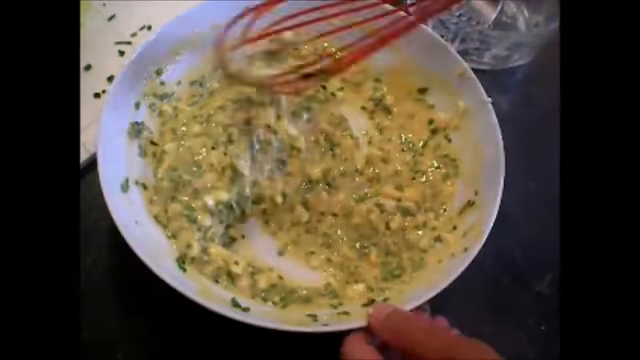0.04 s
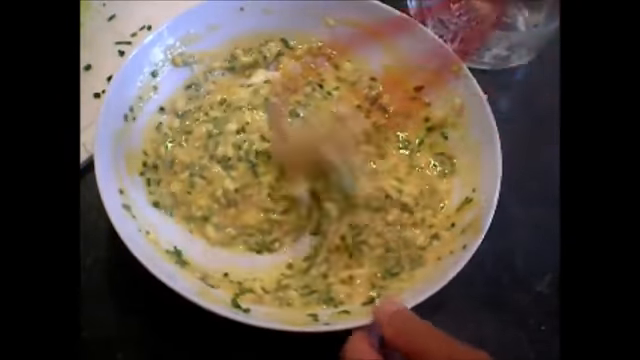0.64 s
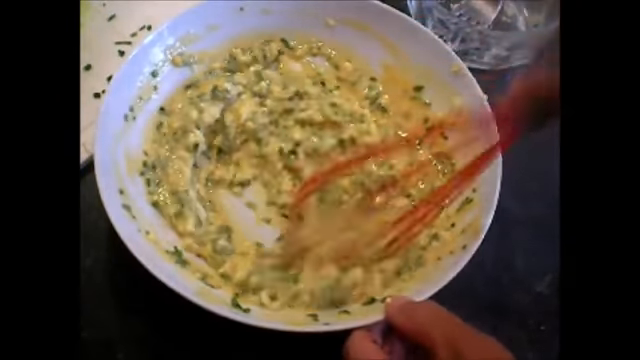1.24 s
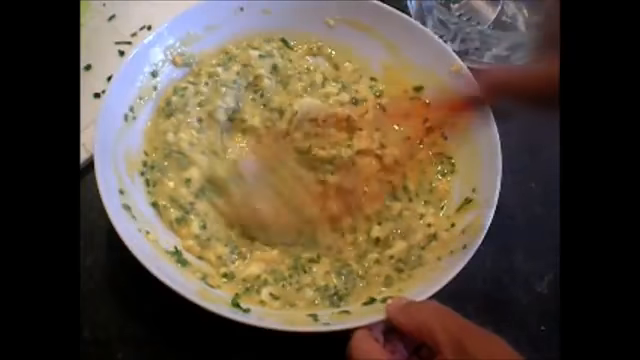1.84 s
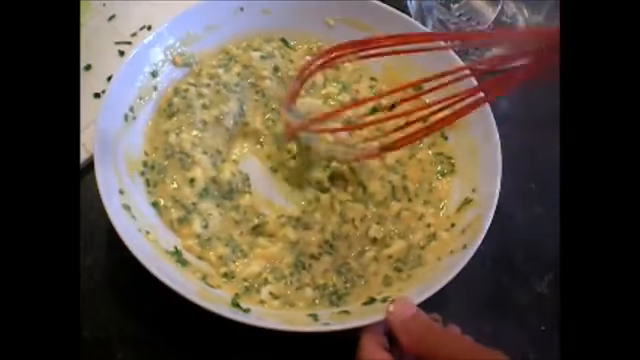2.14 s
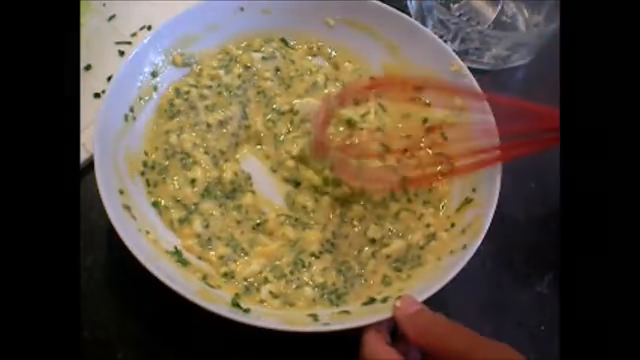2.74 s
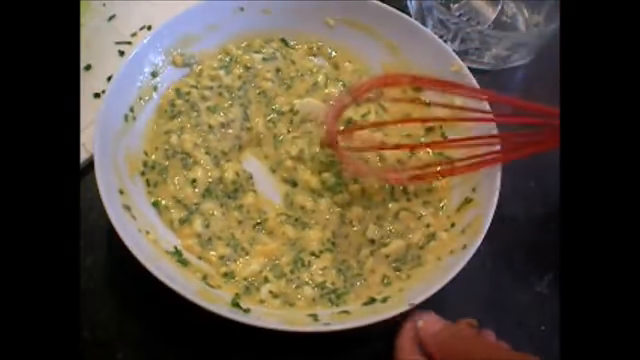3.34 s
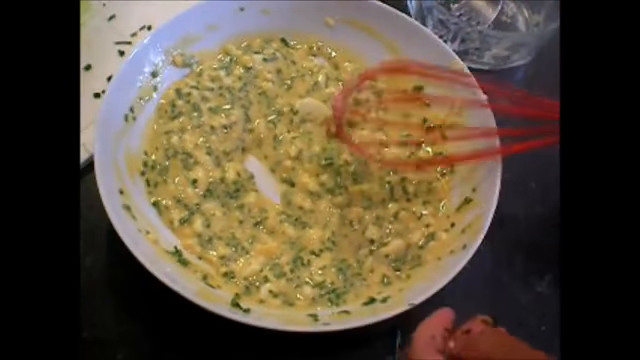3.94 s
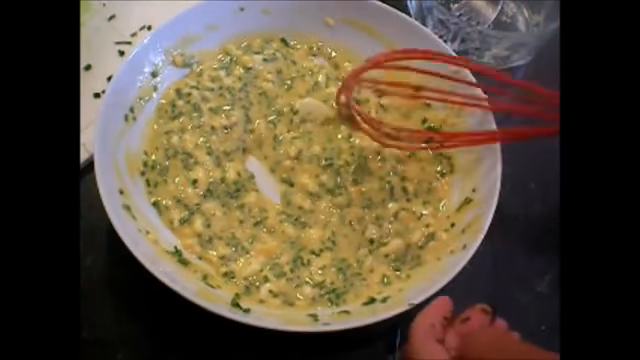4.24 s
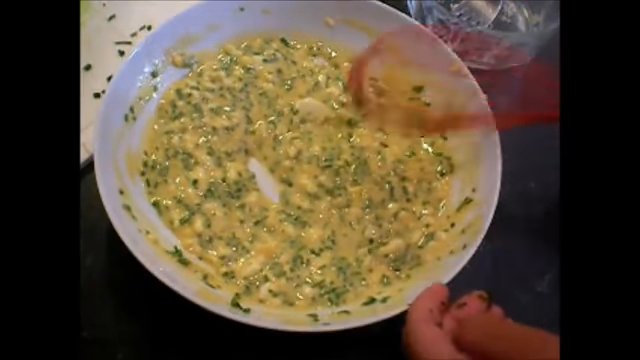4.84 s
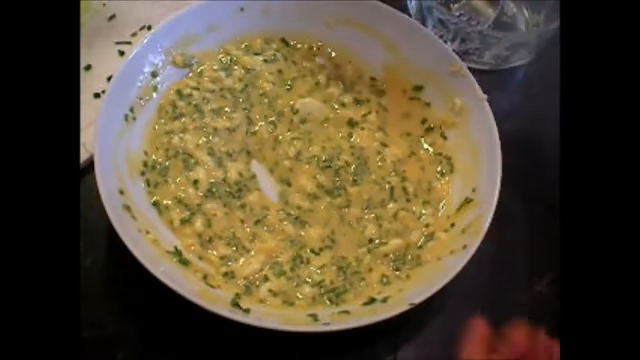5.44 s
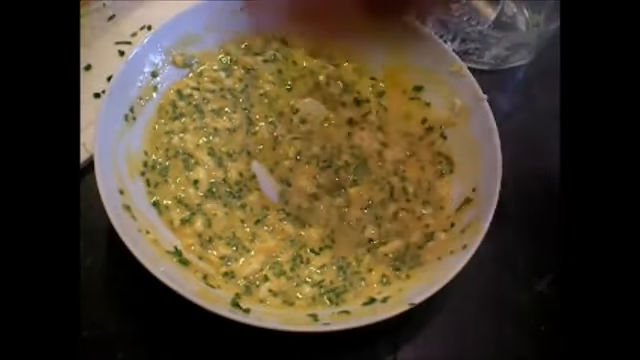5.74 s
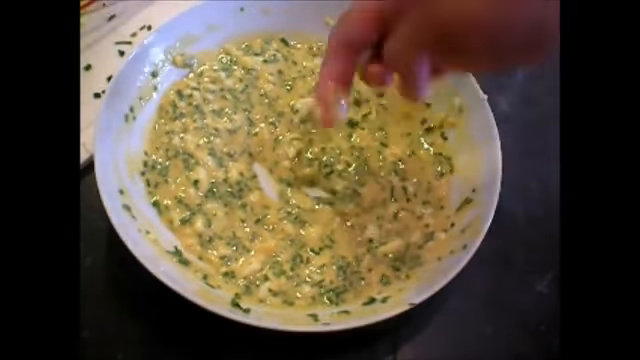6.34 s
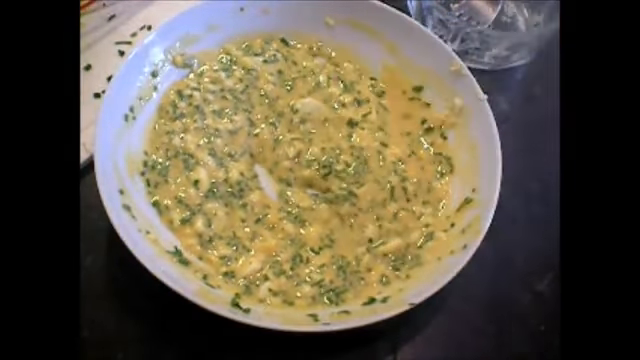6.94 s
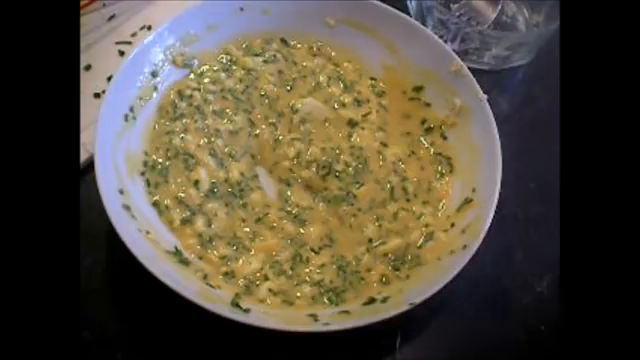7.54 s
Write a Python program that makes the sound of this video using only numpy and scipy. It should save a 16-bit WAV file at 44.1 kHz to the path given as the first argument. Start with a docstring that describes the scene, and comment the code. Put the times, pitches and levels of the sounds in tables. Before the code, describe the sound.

Wet stirring and plops, then about fifteen ringing whisk taps on a bowl, followed by one loud knock and light handling clicks.

```python
"""Wet squishes, plops and smacks: a whisk stirs thick herb sauce in a ceramic bowl, opening air pockets.
Fifteen raps shake the whisk clean, each ringing the bowl while the wires clatter against it.
It is put down with a loud knock and bounces, rattling, against a ringing dish; soft rubs and
light handling clicks surround the knock. A small kitchen adds a short echo, and everything
comes through a hissy, narrow-band microphone that overloads on the knock."""
import sys
import numpy as np
from scipy import signal
from scipy.fft import rfft, irfft, next_fast_len
from scipy.io import wavfile
from scipy.ndimage import uniform_filter1d

SR = 44100
rng = np.random.default_rng(int(sys.argv[2]) if len(sys.argv) > 2 else 0)


def wav_record(signal):
    """Record a signal, one row per channel, as 16-bit PCM in the file named by sys.argv[1]."""
    frames = np.transpose(np.atleast_2d(signal))
    bounded = np.clip(frames, -1, 1)
    # unit amplitude maps onto the largest positive 16-bit level
    quanta = np.round(bounded * 32767).astype(np.int16)
    wavfile.write(sys.argv[1], SR, quanta)


N = 335019
T = np.arange(round(.5 * SR)) / SR  # time axis of one hit
LEAD = 256  # samples of silence ahead of a voiced hit
# low, mid and high band edges of smacks and clicks: f/Hz
SMALL_EDGES_HZ = [250, 800, 2200, 4000]


def amp(db):
    """Decibels to gain."""
    return 10 ** (np.asarray(db) / 20)


def unit_rms(x):
    """Scales to rms 1."""
    return x / np.sqrt(np.mean(x ** 2) + 1e-20)


def curve_at(points, hz):
    """Reads (f/Hz, value) points on a log-frequency axis."""
    f, value = np.transpose(points)
    return np.interp(np.log(hz + 1), np.log(f + 1), value)


def eq(x, spectrum):
    """Filters by a curve of (f/Hz, gain/dB) points."""
    size = next_fast_len(len(x), True)
    gain = amp(curve_at(spectrum, np.fft.rfftfreq(size, 1 / SR)))
    return irfft(rfft(x, size) * gain, size)[:len(x)]


def add(mix, s, sound):
    """Mixes a sound in at s seconds."""
    part = mix[max(round(s * SR), 0):][:len(sound)]
    part += sound[:len(part)]


def ring(modes, spread_db, detune=0):
    """Dying sines; the point of contact favours some modes, and the grip can detune them a little."""
    hz, db, t60 = np.transpose(modes)[:, :, None]
    polarity = (-1) ** np.arange(len(hz))[:, None]
    gain = polarity * amp(db + spread_db * rng.standard_normal(db.shape))
    hz = hz * (1 + detune * rng.standard_normal(hz.shape))
    return (gain * amp(-60 * T / t60) * np.sin(2 * np.pi * hz * T)).sum(0)


def room_tail(spectrum, rise_s):
    """A diffuse wash of noise, each band dying at the kitchen's own speed."""
    # kitchen reverb time: f/Hz, t60/s
    decay = [(100, 0.63), (400, 0.37), (800, 0.39), (1500, 0.34), (3500, 0.34)]
    noise = unit_rms(eq(rng.standard_normal(len(T)), spectrum))
    hz, t, bands = signal.stft(noise, SR, nperseg=512)
    fade = amp(-60 * t / curve_at(decay, hz)[:, None])
    wash = signal.istft(bands * fade, SR, nperseg=512)[1][:len(T)]
    return wash * (1 - np.exp(-T / rise_s))


def in_kitchen(x, wet_db):
    """A sound plus its own echo from the kitchen."""
    echo = room_tail([(100, 0.0084), (4000, 0.0098)], rise_s=0.0023)
    return x + amp(wet_db) * signal.fftconvolve(x, echo / np.linalg.norm(echo))[:len(x)]


def voiced(x, edges_hz, peaks_db, window_s):
    """Gives a hit its weight and colour: a smooth EQ steers each band's peak toward its target."""
    x = np.pad(x, (LEAD, 32768 - LEAD - len(x)))
    spectrum, hz = rfft(x), np.fft.rfftfreq(len(x), 1 / SR)
    colour = []
    for lo, hi, db in zip(edges_hz, edges_hz[1:], peaks_db):
        band = irfft(spectrum * (hz > lo) * (hz < hi))
        peak_power = uniform_filter1d(band ** 2, max(round(window_s * SR), 1)).max()
        colour += [(f, db - 10 * np.log10(peak_power)) for f in np.linspace(lo, hi, 6)[[1, 4]]]
    thin_bass = [(45, colour[0][1] - 20), (130, colour[0][1] - 2)]  # small things radiate little bass
    return eq(x, thin_bass + colour)


def hiss(level_db=-48):
    """Steady noise of the microphone."""
    # noise colour: f/Hz, relative density/dB
    colour = [(15, -30), (25, -16.5), (76, -8), (152, -7), (246, -6), (291, -3.5), (481, -3.5), (864, -4),
              (1110, -5), (1290, -6.5), (1620, -7.5), (3520, -9.5), (4100, -10.5), (5000, -80)]
    return amp(level_db) * unit_rms(eq(rng.standard_normal(N), colour))


def pressure(start, length, attack_s, release_s, sag_db):
    """One stroke presses in, eases as it travels and lifts off."""
    t = np.arange(N) / SR - start
    contact = np.clip(np.minimum(t / attack_s, (length - t) / release_s + .5), 0, 1)
    return contact * amp(sag_db * np.clip(t / length, 0, 1))


def friction(strokes, pops_per_s, spread_db, low_db, high_db, **envelope):
    """Crowds of tiny pops under each stroke: a dull squish and a finer crackle."""
    # colours of the two layers: f/Hz, gain/dB
    squish = [(50, -42.5), (170, -17), (340, -2), (520, -0.5), (1200, -6), (2000, -25), (5000, -53.5)]
    crackle = [(100, -56), (500, -4.5), (1500, 0), (3700, 5.5), (6000, -52)]
    _, _, squish_db, crackle_db = np.transpose(strokes)
    pressed = np.array([pressure(start, length, **envelope) for start, length, *_ in strokes])
    out = np.zeros(N)
    for db, colour in ((squish_db + low_db, squish), (crackle_db + high_db, crackle)):
        sizes = rng.standard_normal(N) * amp(spread_db * np.minimum(rng.exponential(1, N), 4))
        pops = sizes * (rng.random(N) < pops_per_s / SR)
        texture = unit_rms(eq(in_kitchen(pops, wet_db=-5), colour))
        out += texture * (amp(db) @ pressed)
    return out


def stirring():
    """The whisk drags through the sauce in sparse, uneven pops."""
    # whisk strokes: t/s, length/s, relative squish/dB, relative crackle/dB
    strokes = [(.01, 0.18, -49, -58), (.23, 0.068, -71, -47), (.39, 0.14, -67, -50),
               (.62, 0.12, -47.5, -53), (.8, 0.22, -52.5, -63), (1.07, 0.12, -50, -70),
               (1.19, .08, -62, -45), (1.38, 0.077, -51, -44), (1.48, 0.35, -48, -54),
               (1.8, .08, -56, -47.5), (1.96, 0.16, -53, -58)]
    return friction(strokes, pops_per_s=700, spread_db=2, low_db=-0.5, high_db=-4.5,
                    attack_s=0.027, release_s=0.056, sag_db=-6)


def plops(glide=0.52):
    """Each air pocket in the sauce rings like a bubble, rising a little as it opens."""
    # air pockets: t/s, level/dB, starting f/Hz, t60/s
    pockets = [(0.066, -26.5, 500, 0.061), (0.484, -36.5, 453, 0.079), (0.588, -32.5, 310, 0.04),
               (0.645, -43, 762, 0.1), (0.815, -40, 544, 0.11), (0.832, -41, 611, 0.1),
               (1.092, -38, 477, 0.055)]
    out = np.zeros(N)
    for s, db, hz, t60 in pockets:
        tone = np.sin(2 * np.pi * hz * T * (1 + glide * T))
        envelope = amp(db - 60 * T / t60) * (1 - np.exp(-T / 0.0029))
        add(out, s, in_kitchen(tone * envelope, wet_db=-12))
    return out


def small_colour(db, hz, fall_db_per_octave=9):
    """Band peaks of a smack or click: strongest around hz, weaker to either side."""
    edges = np.log2(SMALL_EDGES_HZ)
    centres = (edges[1:] + edges[:-1]) / 2
    return db - fall_db_per_octave * abs(centres - np.log2(hz))


def smacks():
    """A film of sauce snaps off a wire: a tick and a short fizz."""
    # snapping films: t/s, level/dB, strongest f/Hz
    films = [(.45, -39.5, 3800), (.482, -34.5, 3800), (.881, -35, 3100), (.985, -43, 1450),
             (1.144, -39.5, 1000), (1.323, -40, 3800), (1.5, -38, 1450), (1.595, -39.5, 1400),
             (1.608, -41.5, 2800), (1.644, -40, 3800), (1.865, -28, 1620), (1.877, -30, 1410),
             (1.973, -36, 1850), (2.001, -39, 1200), (2.212, -38, 3500), (2.223, -38, 1860),
             (2.352, -32.5, 3760)]
    out = np.zeros(N)
    for s, db, hz in films:
        snap = 0.14 * rng.standard_normal(len(T)) * np.exp(-T / 0.014)
        snap[0] += 3  # the tick
        snap = signal.lfilter(*signal.butter(2, 350, "high", fs=SR), snap)  # too small to move bass
        snap = in_kitchen(snap, wet_db=-12)
        add(out, s - LEAD / SR, voiced(snap, SMALL_EDGES_HZ, small_colour(db, hz), window_s=0.0049))
    return out


def rap_colour(force, hollow, clean):
    """Band peaks of a rap in dB; the place of contact trades the hollow body against the main ring."""
    low, high = .55 * force, 1.45 * force  # a harder rap is brighter
    thud = -35.5 + low
    body = -27 + low + hollow
    low_ring = -30 + low + hollow
    main_ring = -29.5 + high - .8 * hollow + clean
    clack = -32 + high - .8 * hollow - clean
    top_ring = -31 + high + .7 * hollow
    return [thud, body, low_ring, main_ring, clack, top_ring]


def raps(clatter_db=-9, chatter=0.42, thump_growth=1.9):
    """Each rap rings bowl and kitchen, the wires slap again lightly, and hard raps thump the counter."""
    # whisk on bowl: t/s, force/dB, hollowness/dB, cleanness (ring against wire clack)/dB
    hits = [(2.763, 1, -4, 1.5), (2.905, -1, -2.5, -1), (3.0595, 0.5, -1.5, 4), (3.2152, 5.5, -1, -1),
            (3.3748, 5, -0.5, 1), (3.535, 2.5, -0.5, -0.5), (3.692, 3, 1, -0.5), (3.853, -2, -.5, -.5),
            (4.02, 1.5, .5, -0.5), (4.184, 1, 3, -0.5), (4.35, -4.5, 0.5, -.5), (4.5262, -6.5, 1, 2),
            (4.733, -5, -1.5, 2), (4.891, -3.5, 0, -1), (5.274, 1.5, 3, -2.5)]
    # low resonances of the kitchen, higher modes of the bowl and wires: f/Hz, relative level/dB, t60/s
    resonances = [(145, -22.5, 0.057), (385, -16.5, 0.16), (455.4, -15, 0.26), (598, -15.5, 0.24),
                  (708, -20.5, 0.093), (766, -18, 0.33), (870, -19.5, 0.051), (905.4, -9.5, 0.11),
                  (957, -8.5, 0.042), (1008, -6.5, 0.1), (1076.5, -9, 0.093), (1298, -21, .18),
                  (1367, -12.5, 0.22), (1410, -18, 0.14), (1548, -21, 0.16), (1834, 5.5, 0.034),
                  (2121, -1.5, .24), (2150, 4, .065), (2226, 10.5, 0.039), (2553, 7.5, 0.016),
                  (2713, 6, 0.017), (2943, -2.5, 0.093), (3004, -5, .24), (3033, -3, .08), (3077, 3, 0.02),
                  (3660, -9.5, 0.064), (4005, -6, 0.084)]
    # dull clatter of wires and counter: f/Hz, relative density/dB
    clatter_colour = [(60, -11.5), (140, -7), (220, -14), (380, 5.5), (800, 4), (1100, -1.5), (1550, -1),
                      (1900, -14), (2600, -14.5), (3300, -4.5), (4000, -17.5)]
    # edges of the six bands from thud to top ring: f/Hz
    edges_hz = [150, 650, 1200, 1650, 2230, 2850, 4000]
    # modes of the counter under the bowl: f/Hz, relative level/dB, t60/s
    counter_modes = [(166, -54, 0.098), (215, -52, .06)]
    out = np.zeros(N)
    for s, force, hollow, clean in hits:
        ringing = ring(resonances, spread_db=1.3, detune=.002)
        rap = ringing.copy()
        for delay_s, slap in zip(rng.uniform(0.00041, 0.0093, 3), rng.standard_normal(3) / 2):
            add(rap, delay_s, chatter * slap * ringing)
        rap = in_kitchen(rap, wet_db=-10) + amp(clatter_db) * room_tail(clatter_colour, rise_s=0.0015)
        add(out, s - LEAD / SR, voiced(rap, edges_hz, rap_colour(force, hollow, clean), window_s=0.012))
        add(out, s, amp(thump_growth * force) * ring(counter_modes, spread_db=3, detune=0.066))
    return out


def rubbing():
    """A hand slides over things with a dense, scratchy grain."""
    # hand strokes: t/s, length/s, relative dull layer/dB, relative scratch/dB
    strokes = [(5.4, 0.18, -42, -51), (5.59, .14, -43.5, -55), (5.9, .07, -45, -52),
               (6.22, 0.26, -58.5, -53.5), (6.45, 0.11, -65.5, -52), (6.6, 0.31, -59, -54.5),
               (6.82, 0.32, -67, -52.5), (7.24, 0.17, -52, -49), (7.41, .09, -45.5, -53)]
    return friction(strokes, pops_per_s=2500, spread_db=0, low_db=-2, high_db=7,
                    attack_s=0.023, release_s=.06, sag_db=-6.5)


def clicks():
    """Things moved on the counter knock lightly: a burst of noise and a short ring."""
    # light knocks: t/s, level/dB, strongest f/Hz
    knocks = [(5.425, -36, 706), (5.445, -36, 2100), (5.831, -43, 432), (6.842, -36, 2500),
              (6.92, -32, 1920), (7.03, -32.5, 3700), (7.398, -30, 1150), (7.547, -34, 3800)]
    # utensil modes: f/Hz, relative level/dB, t60/s
    modes = [(387, -6.5, 0.071), (1303, 7.5, 0.045), (1390, -8.5, 0.055), (2600, -9.5, .025),
             (3190, -14.5, 0.028), (3630, -9, 0.068)]
    out = np.zeros(N)
    for s, db, hz in knocks:
        knock = ring(modes, spread_db=2) + 4 * rng.standard_normal(len(T)) * np.exp(-T / .005)
        knock = in_kitchen(knock, wet_db=-6.5)
        add(out, s - LEAD / SR, voiced(knock, SMALL_EDGES_HZ, small_colour(db, hz), window_s=0.0042))
    return out


def landing(ring_db=2, settle_s=6.176, damping_db=-6):
    """The whisk lands hard and bounces, wires rattling; a dish rings, muted as the whisk settles on it."""
    # landing and bounces: t/s, clack gain/dB, wire rattle gain/dB, dish ring gain/dB
    bounces = [(5.961, 3, -15, -35.5), (6.006, -9, -14.5, -39), (6.0118, -11, -24.5, -31),
               (6.0196, -29, -35, -7.5), (6.0533, -37, -24.5, -32.5), (6.0942, -42, -34.5, -22.5),
               (6.158, -47, -38, -29), (6.2, -53.5, -36.5, -55)]
    # modes of the handle on the counter: f/Hz, relative level/dB, t60/s
    handle_modes = [(115.5, -41.5, 0.13), (244, -23.5, 0.02), (336, -31, 0.11), (661, -22, 0.018),
                    (1506, -6.5, 0.012), (1810, 0, 0.0069), (2337, -6, 0.019), (3160, -20, 0.17),
                    (3323, -5.5, 0.014), (3530, 2.5, 0.013)]
    # rattling wires, spread by the kitchen: f/Hz, relative density/dB
    rattle_colour = [(60, -29), (130, -22.5), (300, -10.5), (700, -7.5), (1100, -6), (1500, -2), (2200, -5),
                     (2800, 3), (3300, 5.5), (4000, -7.5)]
    # dish modes, the closest of them beating: f/Hz, relative level/dB, t60/s
    dish_modes = [(2616, 0, .055), (2656, 0, .055), (2636, -11, .42), (2767, -20, .22), (3230, -20.5, .38),
                  (3408, -26, .35), (3655, -21, .22)]
    whisk, dish = np.zeros((2, N))
    for s, clack_db, wires_db, dish_db in bounces:
        clack = ring(handle_modes, spread_db=.5) * (1 - np.exp(-T / .0009))
        add(whisk, s, amp(clack_db) * clack)
        add(whisk, s, amp(wires_db) * room_tail(rattle_colour, rise_s=0.00074))
        chime = ring(dish_modes, spread_db=-1) * (1 - np.exp(-T / 0.00094))
        add(dish, s, amp(dish_db + ring_db) * chime)
    settled = np.clip((np.arange(N) / SR - settle_s) / .01 + .5, 0, 1)
    return whisk + in_kitchen(dish * amp(damping_db * settled), wet_db=-9.5)


def scene():
    """Stirring, rapping, putting down and tidying over the hiss, in mono."""
    strokes = stirring() + rubbing()
    return (strokes + smacks() + plops() + raps() + landing() + clicks() + hiss())[None]


def record(dry, band_hz=3900, edge_hz=13000):
    """A narrow-band input with a slight offset; the loudest knock clips at full scale."""
    band_filter = signal.firwin(301, band_hz, window=("kaiser", 7), fs=SR)
    edge_filter = signal.firwin(255, edge_hz, window=("kaiser", 9), fs=SR)
    narrow = signal.oaconvolve(dry, band_filter[None], "same")
    clipped = np.clip(narrow - .0039, -1, 1)
    return signal.oaconvolve(clipped, edge_filter[None], "same")


dry = scene()
out = record(dry)
wav_record(out)
```